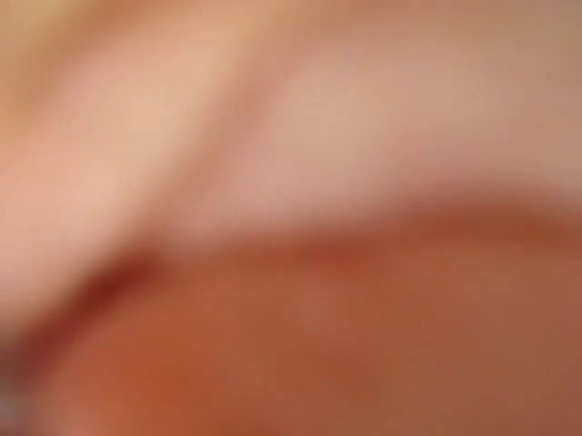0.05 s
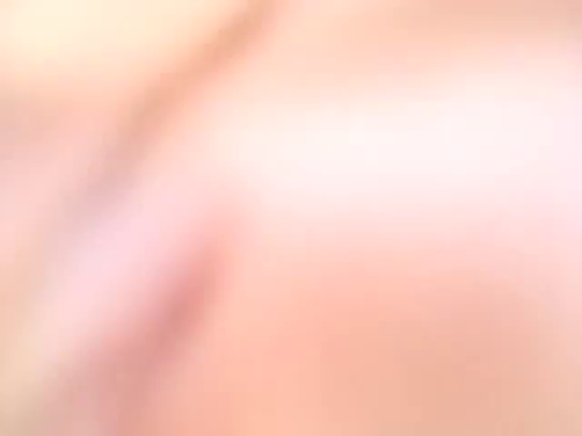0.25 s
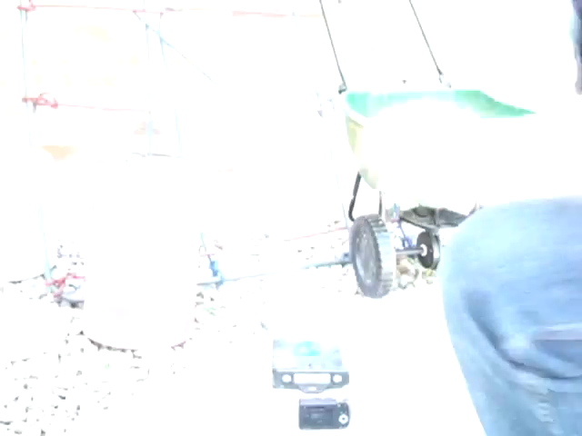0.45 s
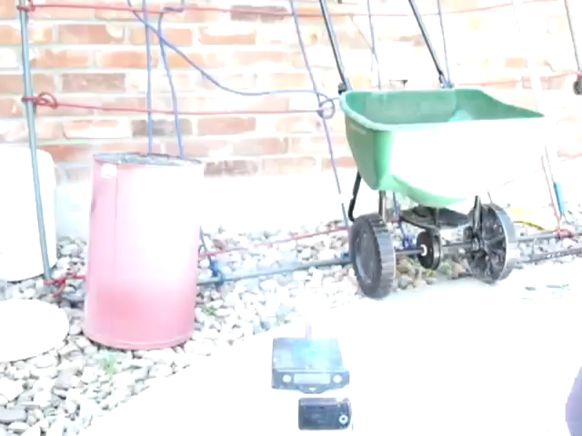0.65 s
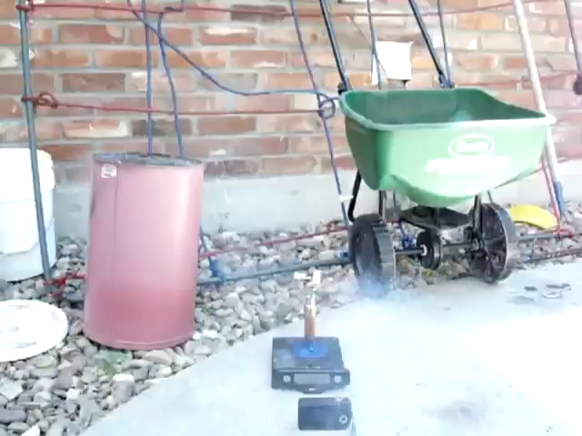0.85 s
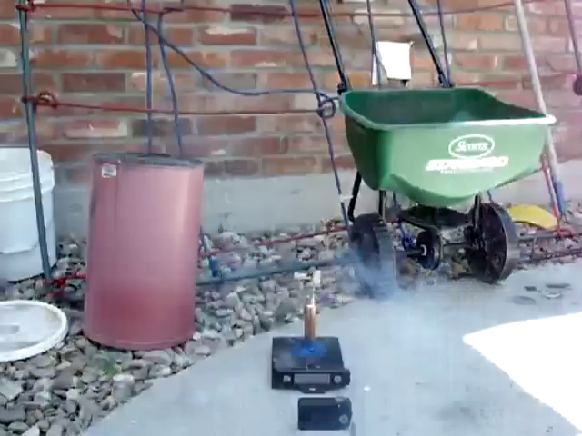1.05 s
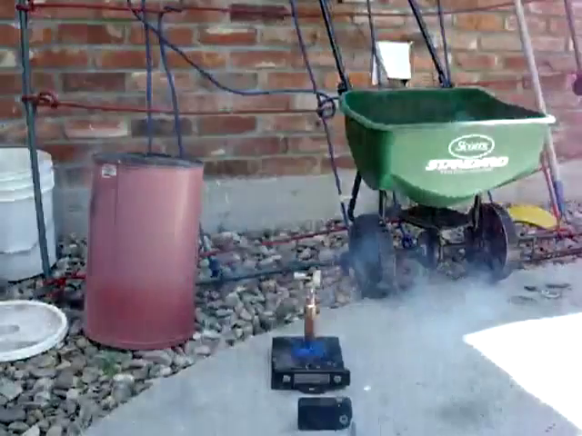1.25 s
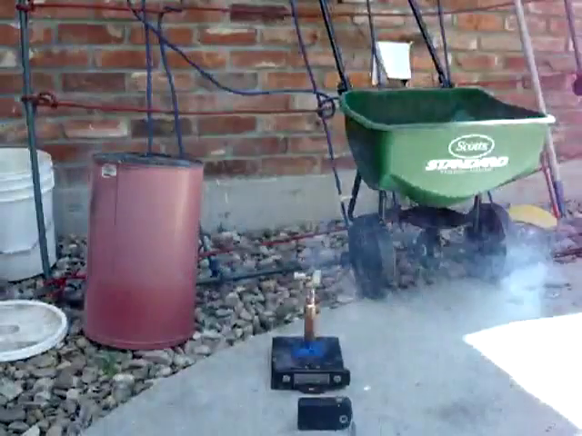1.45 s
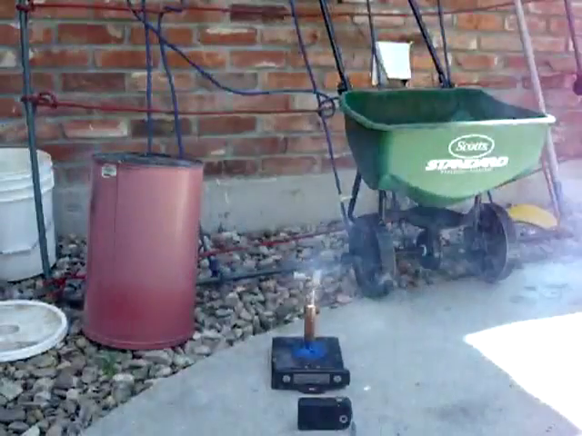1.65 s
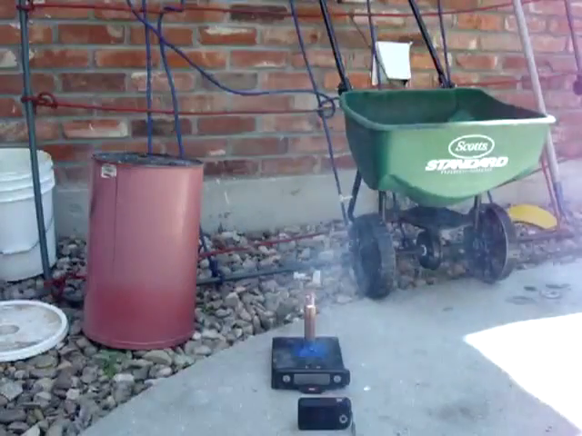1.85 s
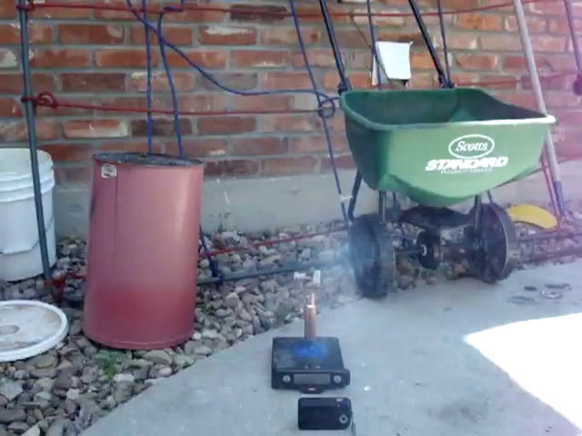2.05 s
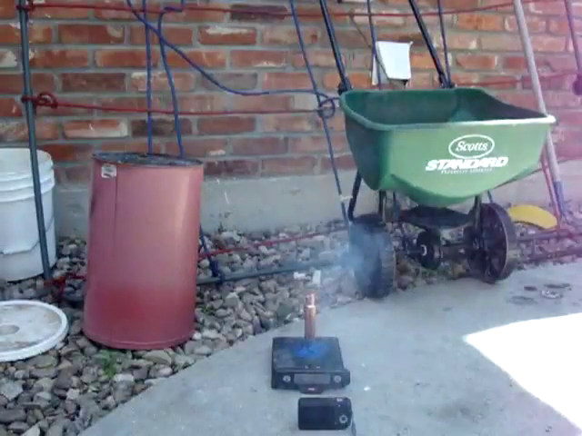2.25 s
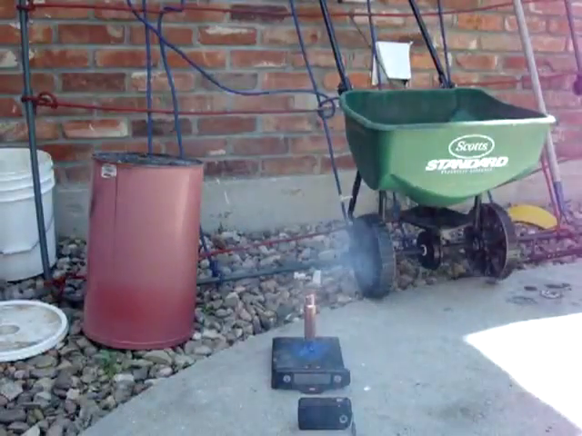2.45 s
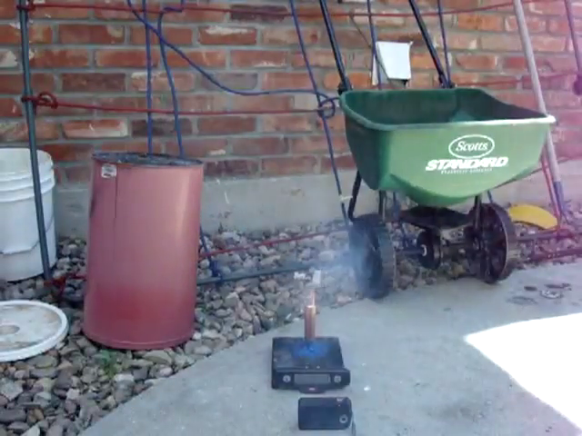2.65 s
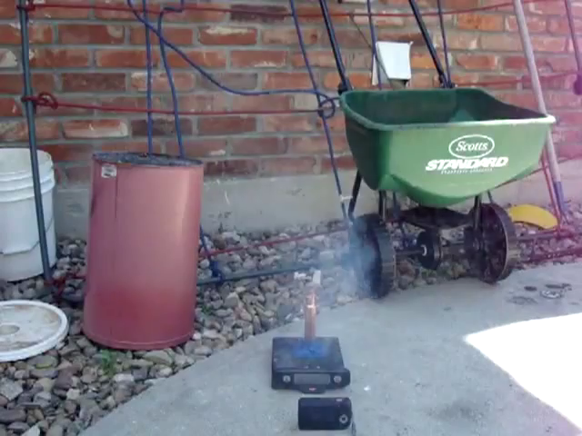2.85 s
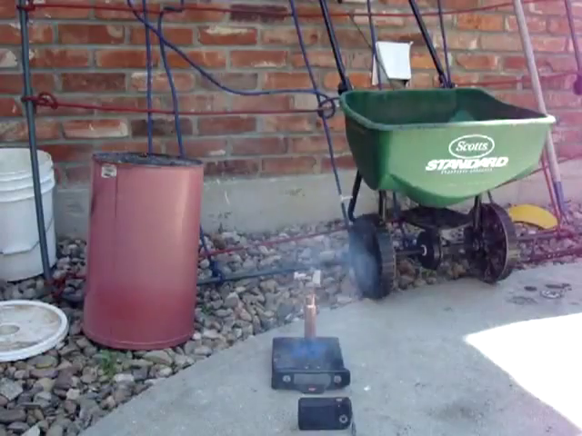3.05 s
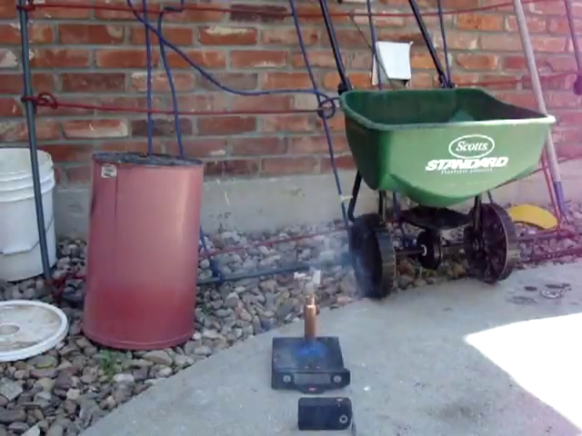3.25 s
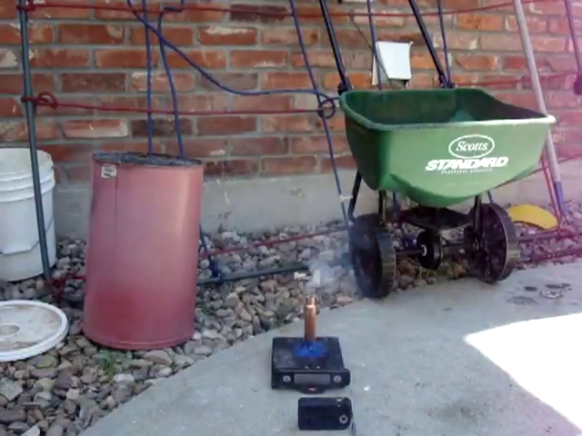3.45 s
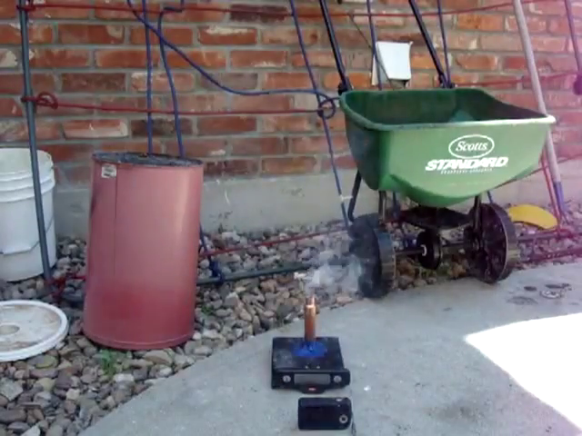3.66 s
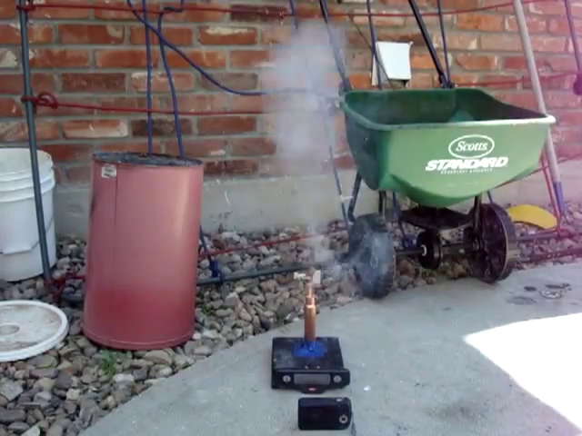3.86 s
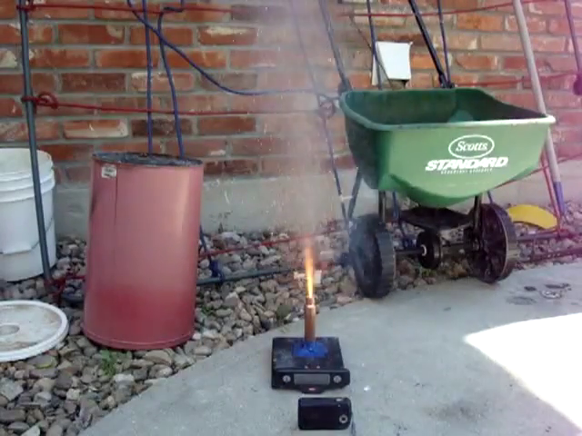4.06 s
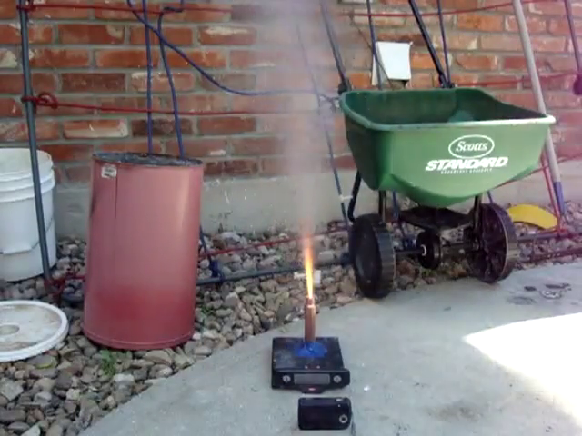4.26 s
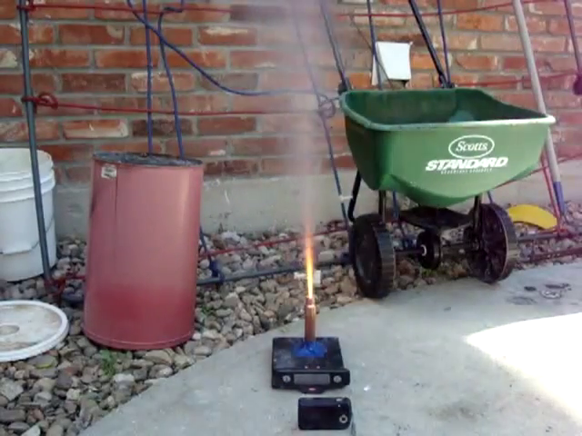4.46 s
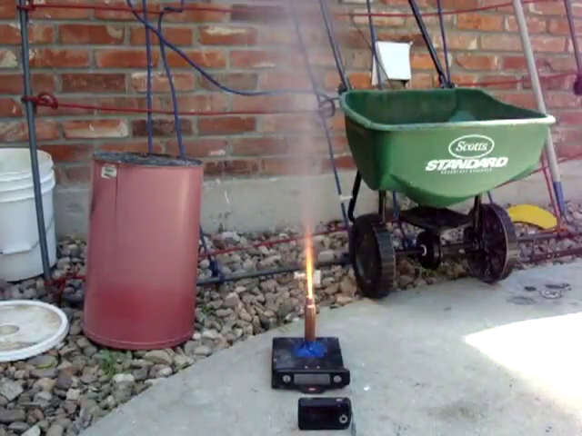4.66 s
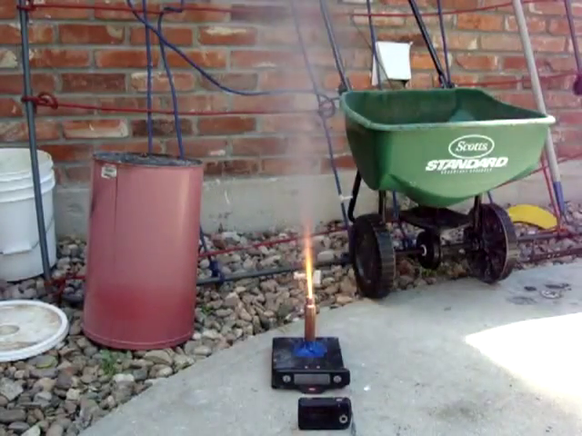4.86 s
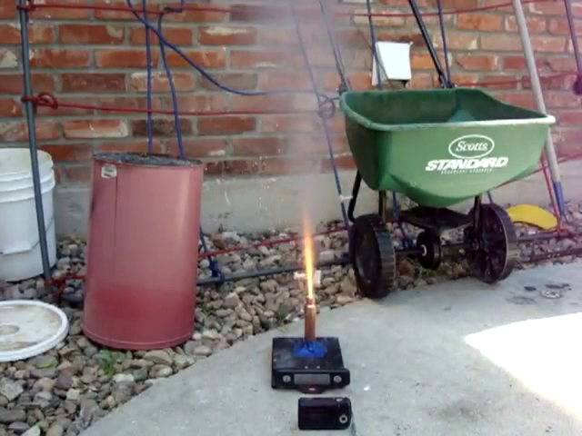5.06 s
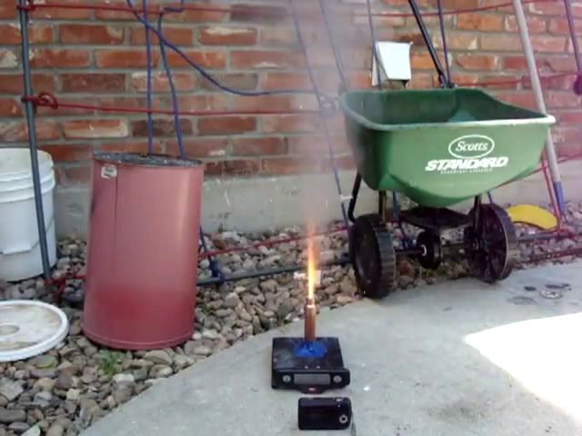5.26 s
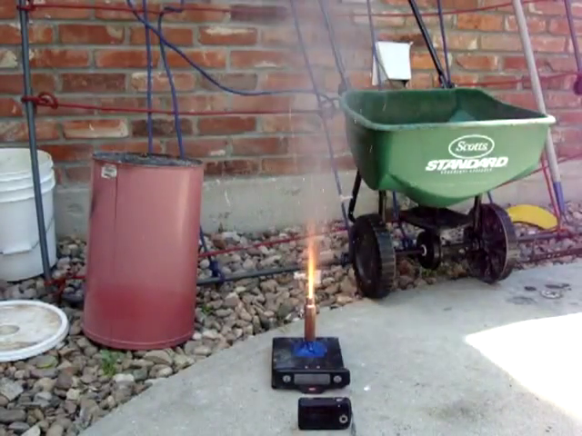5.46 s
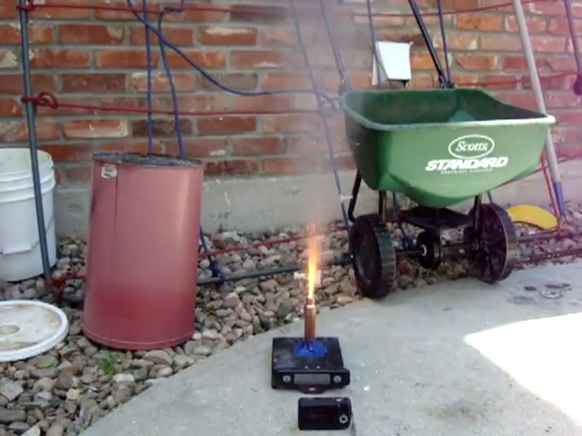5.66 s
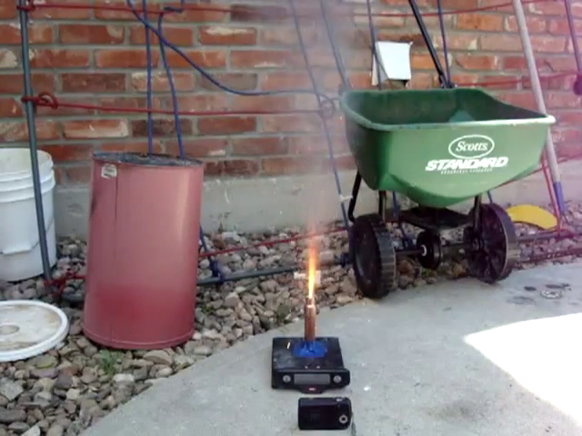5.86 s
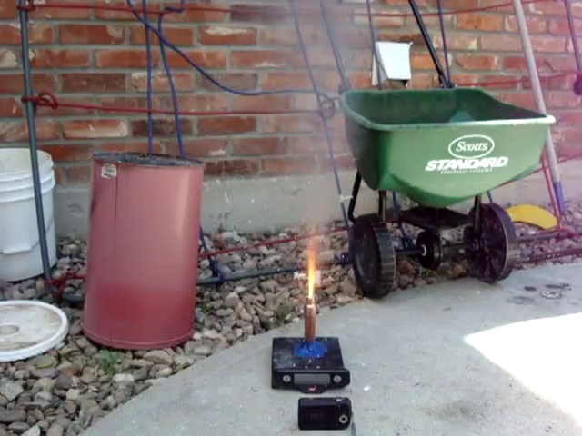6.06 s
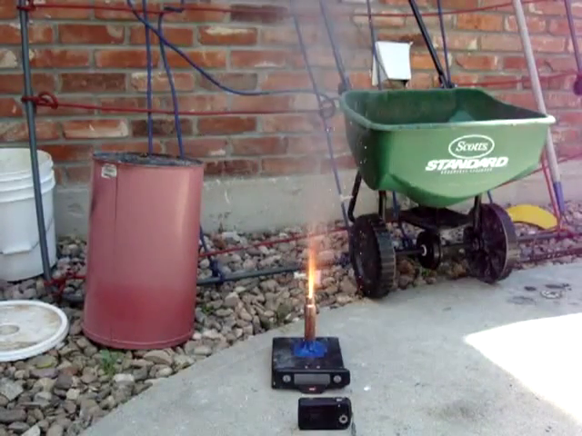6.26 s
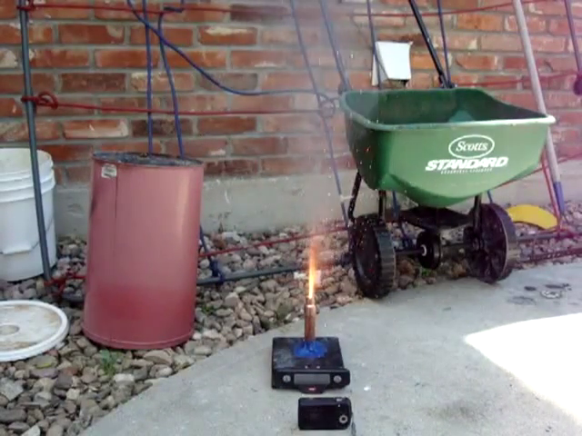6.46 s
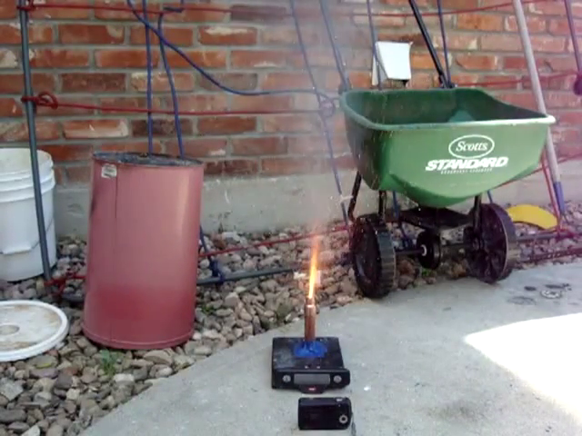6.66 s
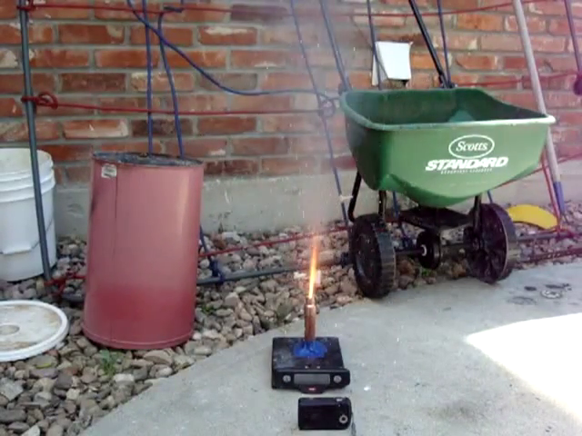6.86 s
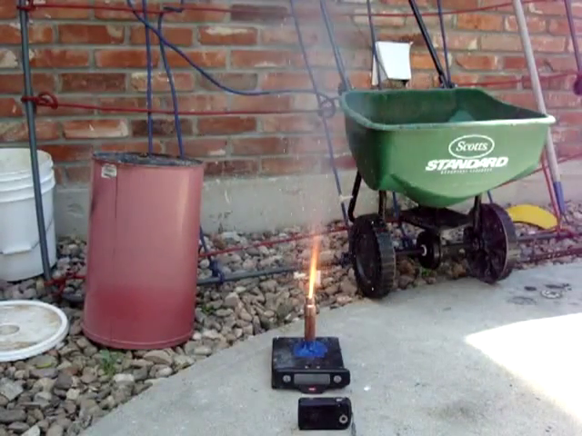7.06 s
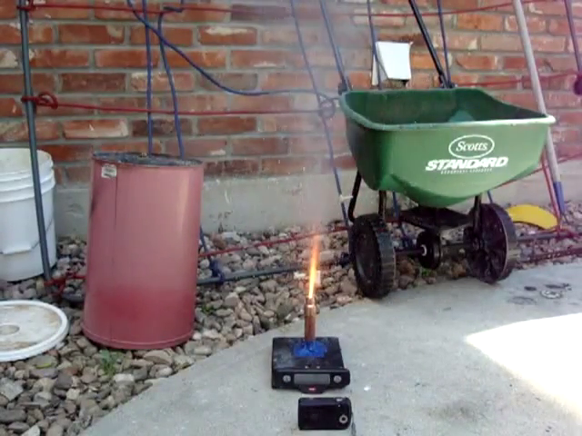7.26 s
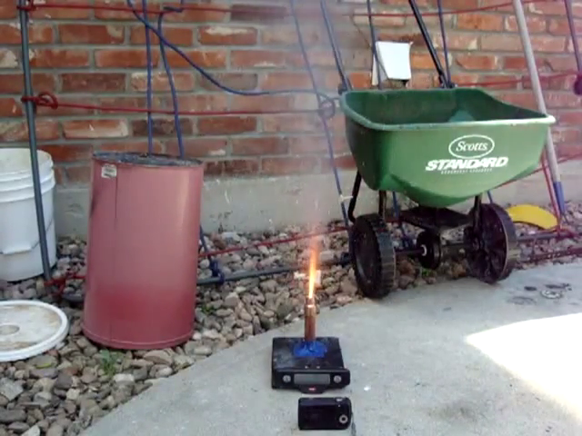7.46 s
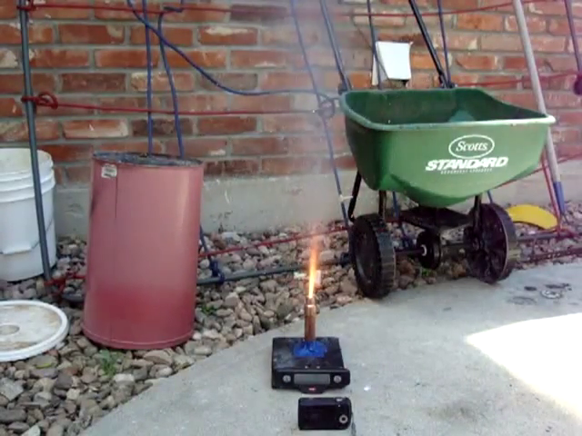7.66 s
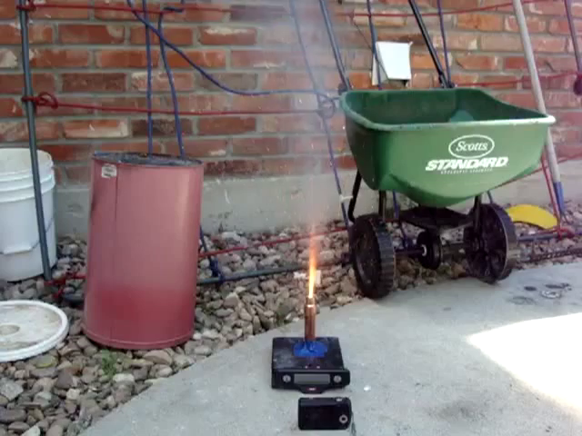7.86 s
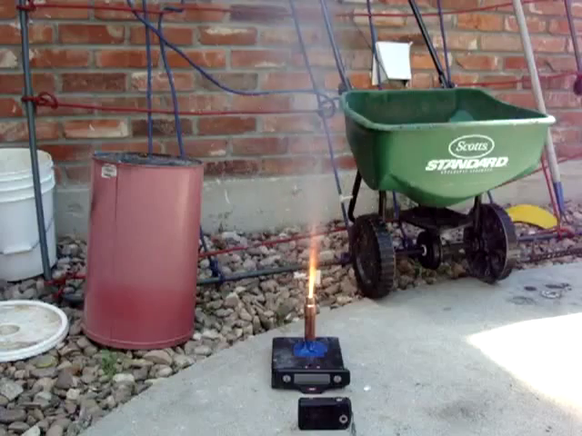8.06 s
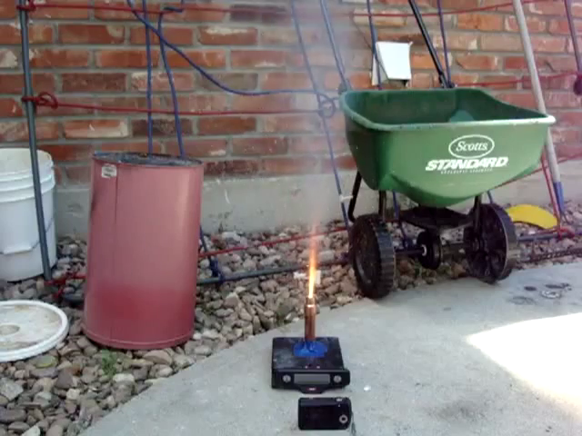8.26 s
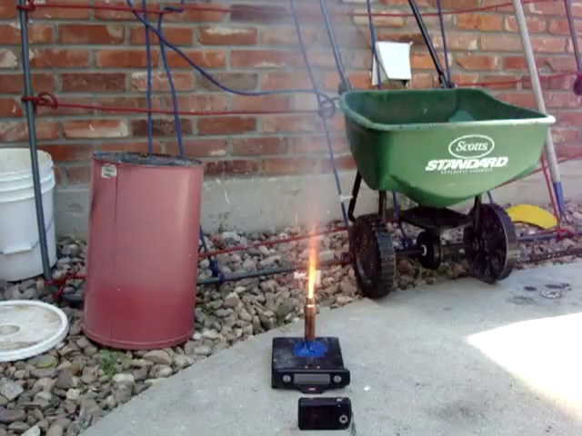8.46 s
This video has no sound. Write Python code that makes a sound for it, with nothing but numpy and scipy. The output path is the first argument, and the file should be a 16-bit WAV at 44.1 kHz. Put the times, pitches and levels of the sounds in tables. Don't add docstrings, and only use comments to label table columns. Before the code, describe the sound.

Faint town rumble and light wind puffs lie behind a bright, sputtering fuse. Footsteps grind on grit, one very hard knock stands out, and a shoe drags briefly. After a quiet smouldering pause, a small rocket motor ignites abruptly: loud screeching hiss, slightly thinner for a moment, then a fuller steady roar with irregular crackling pops, still burning at the cut. Close outdoor pocket camera sound, dull at the very top, with short reflections.

```python
import sys
import numpy as np
from scipy import signal
from scipy.fft import rfft, irfft, next_fast_len
from scipy.io import wavfile

SR = 44100
rng = np.random.default_rng(int(sys.argv[2]) if len(sys.argv) > 2 else 0)


def pcm_store(signal):
    levels = np.round(np.clip(np.atleast_2d(signal), -1, 1) * 32767)
    wavfile.write(sys.argv[1], SR, levels.astype(np.int16).T)


def linear_from_db(decibels):
    return 10 ** (np.asarray(decibels, float) / 20)


N = 375732
IGNITION_S = 3.885

# (time [s], level [dB])
JET_HISS = [
    (3.878, -25.5),
    (3.887, -25),
    (3.891, -15),
    (3.97, -9),
    (4.1, -10),
    (4.3, -13),
    (4.55, -16),
    (5.2, -14.5),
    (8.52, -14),
]
# (frequency [Hz], level [dB per Hz])
JET_COLOUR = [(40, -29), (100, -26), (200, -13), (350, -12.5), (600, -5.5), (1000, -4.5), (1500, -3.5),
              (2000, -6), (2800, -7.5), (4200, -4), (6200, -5), (8000, -4), (10500, -5)]
# (time [s], peak level [dB])
FUEL_POPS = [(5.022, -25), (5.085, -22), (5.18, -11), (5.217, -8.5), (5.314, -23), (5.385, -22.5),
             (5.602, -20.5), (5.621, -23), (5.658, -35), (5.708, -11.5), (5.984, -24), (6.055, -10),
             (6.345, -30), (6.623, -21), (7.006, -26), (7.059, -13.5), (7.123, -25.5), (7.175, -16),
             (7.222, -18), (7.318, -17), (7.514, -24.5), (7.553, -13.5), (7.712, -16.5), (7.859, -17.5),
             (8.006, -12), (8.124, -21.5)]
# (peak time [s], level [dB], swell [s])
FLAME_SURGES = [
    (7.72, 4.5, 0.016),
    (7.87, 6, 0.086),
]
# (peak time [s], hiss level [dB], swell [s])
FUSE_FLARES = [(.2, -39, 0.037), (.27, -38.5, 0.091), (.43, -35.5, .15), (.545, -29.5, 0.01),
               (.79, -30.5, 0.37), (.986, -33.5, .02), (1.17, -27, 0.048), (1.43, -29, .1),
               (1.79, -28, 0.037), (1.92, -28, 0.099), (2.07, -28, 0.21), (2.34, -31.5, 0.017),
               (2.54, -29.5, 0.28), (2.88, -30.5, 0.091), (3.12, -33, .04), (3.18, -32.5, .03),
               (3.31, -35.5, 0.041)]
# (frequency [Hz], level [dB per Hz])
FUSE_COLOUR = [(400, -9.5), (800, -14), (1300, -18.5), (2000, -18), (2600, -20), (3100, -15), (3700, -6),
               (4150, -3.5), (4800, -3.5), (5400, -7), (6300, -4), (7200, -8.5), (8300, -3.5),
               (10300, -10.5)]
# (frequency [Hz], width [Hz], level [dB])
TUBE_RESONANCES = [(1810, 220, 6), (2066, 220, 9.5), (2513, 310, 9), (2540, 280, 2), (4260, 1700, -5)]
# (peak time [s], level [dB], swell [s])
BORE_PEEPS = [
    (3.185, -42, 0.017),
    (3.73, -38, 0.023),
    (4.075, -28, 0.013),
]
# (time [s], peak level [dB], body [Hz], body t60 [s], crack re peak [dB])
PLUG_BLOWOUT = [
    (3.889, -27, 251, .036, -6),
]
# (delay [ms], gain, dulled above [Hz])
ECHOES = [(0.82, -0.07, 4000.0), (1.22, 0.05, 12000.0), (1.32, -0.1, 1500.0), (1.79, -0.05, 4000.0),
          (5.08, 0.03, 12000.0), (5.19, -0.04, 4000.0), (5.56, 0.16, 1500.0), (8.0, 0.09, 1500.0),
          (8.44, 0.05, 12000.0), (8.5, 0.19, 1500.0), (8.78, -0.04, 4000.0), (9.77, -0.05, 4000.0),
          (12.49, 0.09, 1500.0), (13.85, -0.1, 1500.0), (14.42, 0.06, 12000.0), (14.49, -0.1, 1500.0),
          (18.59, 0.06, 1500.0), (19.14, -0.08, 1500.0)]
# (time [s], peak level [dB], body [Hz], body t60 [s], crack re peak [dB])
GROUND_KNOCKS = [(1.25, -29, 560, 0.057, -12), (1.349, -10.5, 347, 0.046, -17), (1.3645, -7, 400, .032, -4),
                 (1.445, -22, 666, .036, -15), (1.473, -19, 720, 0.037, -19), (1.506, -25, 486, 0.055, -13),
                 (1.526, -19.5, 538, 0.033, -16), (1.55, -22, 610, 0.029, -10), (1.8222, 4, 454, 0.025, -2),
                 (1.8265, -3.5, 775, 0.043, -7), (1.8355, -7.5, 362, 0.054, -14),
                 (1.844, -11, 490, 0.014, -1), (2.0165, -17.5, 571, 0.028, -18),
                 (2.0845, -12, 630, .028, 0.5), (2.1035, -9.5, 387, 0.07, -10),
                 (2.115, -15, 520, 0.053, -20), (2.204, -24, 398, 0.043, -10), (2.505, -19, 624, 0.02, -2)]
# (time [s], peak level [dB], body [Hz], body t60 [s], crack re peak [dB])
GRIT_CRUNCHES = [
    (.953, -17, 318, 0.03, -12),
    (.961, -11, 213, 0.015, -20),
    (.979, -20, 390, 0.094, 2),
    (.992, -25, 900, 0.054, 0),
    (1.13, -29, 294, 0.11, -6),
    (1.15, -26, 300, 0.046, 5),
    (1.7825, -5, 430, 0.052, -5.5),
    (1.785, -8.5, 397, 0.017, -6.5),
    (1.791, -18, 496, 0.051, -1),
    (1.798, -22.5, 378, .04, 2),
]
# (time [s], level [dB])
SCUFF_LEVEL = [
    (2.76, -57),
    (2.784, -49),
    (2.836, -39),
    (2.87, -29),
    (2.94, -22),
    (3.0, -34.5),
    (3.04, -43),
]
# (time [s], peak level [dB], body [Hz], body t60 [s], crack re peak [dB])
SCUFF_CATCHES = [
    (2.788, -28, 232, 0.082, -14),
    (2.849, -19, 283, .04, -18),
    (2.887, -11.5, 497, 0.024, -10),
    (2.922, -10, 630, 0.019, -14),
    (2.938, -15, 456, 0.084, -18),
    (2.962, -27, 590, .03, -18),
]
# (frequency [Hz], level [dB per Hz])
SCUFF_COLOUR = [(41, -51), (70, -23), (215, 1.5), (347, -6), (397, 2), (428, -6), (802, -5.5), (1260, -22),
                (2500, -21.5), (3250, -56), (5500, -120)]
# (time [s], level [dB])
YARD_LEVEL = [
    (0.0, -48.5),
    (.85, -44),
    (2.0, -45),
    (3.89, -49.5),
    (4.15, -71),
    (5.65, -62),
    (8.52, -71),
]
# (frequency [Hz], level [dB per Hz])
YARD_COLOUR = [(26, -48), (45, -20.5), (103, -7.5), (156, -11), (370, -7.5), (600, -7), (900, -7),
               (1300, -9.5), (2000, -11.5), (3000, -12), (4500, -13.5), (5500, -21.5), (7500, -26),
               (10300, -29)]
# (peak time [s], level [dB], swell [s])
DEEP_SWELLS = [(.06, -41, .08), (.75, -47, .05), (.97, -48, .05), (1.35, -53, .05), (1.66, -40, .05),
               (1.83, -44, .04), (2.36, -44, .04), (2.48, -41, .06), (3.16, -51, .05), (3.48, -51, .1),
               (3.63, -52, .04), (3.96, -32, 0.061), (4.15, -54, .1), (4.65, -48, 0.052), (4.87, -45, 0.067),
               (5.54, -49, .05), (5.77, -50, 0.16), (6.38, -56, .05), (6.5, -51, .05), (7.06, -52, .05),
               (7.28, -46, 0.14), (7.95, -53, .06), (8.16, -46, .05), (8.3, -55, .05)]
# (time [s], length [s], boost [dB])
TICK_SPELLS = [
    (3.17, 0.37, 15),
    (4.65, 0.22, 12),
    (5.55, .25, 8),
    (6.38, .05, 8),
    (7.05, 0.22, 8),
    (7.95, 0.27, 9),
]
# (frequency [Hz], level [dB])
TOP_CUT = [(9990, 0), (10090, -11), (10180, -30), (10250, -80), (10300, -120)]


def jet():
    gate, hiss_db = in_time(JET_HISS)
    mid_db, low_db = flame_balance()
    flutter = drift(45)
    since = np.arange(N) / SR - IGNITION_S
    pops = np.zeros(N)
    for s, db in FUEL_POPS:
        pops[round((s + .002) * SR)] = linear_from_db(db + 43) * rng.choice([-1, 1])
    turbulence = rng.standard_normal(N) + 0.52 * grains(1500, spread_db=1.0)
    lumps = .5 * grains(60, spread_db=-1.0) + pops

    low, rest = split(coloured(turbulence, JET_COLOUR), 1570)
    mid, high = split(rest, 4880)
    lump_thuds = split(coloured(lumps, JET_COLOUR), 2000)[0] / low.std()
    low = rms_one(low) * linear_from_db(2.44 * flutter) + 0.74 * lump_thuds
    low = band(rms_one(low), 110, 9000)
    out = rms_one(high) * linear_from_db(.4 * flutter + .3 * drift(25))
    out += rms_one(mid) * linear_from_db(mid_db + .8 * flutter + .3 * drift(25))

    screech_db = -14 - 46 * np.maximum(since - .07, 0)
    out += linear_from_db(screech_db) * rms_one(resonance(turbulence, 4680, 1000))
    whoomp_db = -21.5 - 200 * np.maximum(since - .06, 0)
    out += linear_from_db(whoomp_db) * rms_one(band(turbulence, 110, 696))
    barrel = linear_from_db(-18) * rms_one(resonance(resonance(low, 352, 127), 352, 127))
    deep, upper = split(low + barrel, 690)
    hollow_db = -5 * (step(4.2, .06) - step(4.8, .1))
    out += (deep * linear_from_db(hollow_db) + upper) * linear_from_db(low_db + 4.0)
    return gate * linear_from_db(hiss_db - 1.35) * out


def flame_balance():
    full = step(4.66, .71)
    surge_db = swells(FLAME_SURGES, 6, 61, 0)
    blast_fade_db = 200 * np.maximum(np.arange(N) / SR - IGNITION_S - .06, 0)
    mid_thin_db, mid_full_db, mid_blast_db = -13, -6.5, -6
    low_thin_db, low_full_db, low_blast_db = -32, -20, -21.5
    mid_db = np.maximum(mid_thin_db + (mid_full_db - mid_thin_db) * full, mid_blast_db - blast_fade_db)
    low_db = np.maximum(low_thin_db + (low_full_db - low_thin_db) * full, low_blast_db - blast_fade_db)
    return mid_db + 0.38 * surge_db, low_db + surge_db


def fuse():
    t = np.arange(N) / SR
    lit, buried, fired = step(.165, .0075), step(3.34, .006), step(IGNITION_S, .003)
    flares_db = np.where(t < FUSE_FLARES[-2][0], swells(FUSE_FLARES, 3.5, 28, -51.5),
                         swells(FUSE_FLARES[-2:], 3.5, 99, -44))
    hiss_db = (1 - lit) * -46.5 + (lit - buried) * flares_db + buried * -52
    spit = rng.standard_normal(N) + .2 * grains(730, spread_db=-3.0)
    hiss = linear_from_db(hiss_db + 1.1 * drift(16)) * coloured(spit, FUSE_COLOUR)

    gas_db = (1 - lit) * -48 + (lit - buried) * (-37.5 + 0.2 * (flares_db + 31.5))
    gas_db += (buried - fired) * (-38.5 + 9 * np.exp(-abs(t - IGNITION_S) / .065))
    since = np.maximum(t - IGNITION_S, 0)
    gas_db += fired * np.maximum(-21.5 - 150 * since, -20 - 36 * since)
    gas = rng.standard_normal(N)
    tube = np.zeros(N)
    for k, (hz, width_hz, db) in enumerate(TUBE_RESONANCES):
        tube += linear_from_db(db) * (-1) ** k * resonance(gas, hz, width_hz)
    broad = rms_one(band(gas, 1500, 4300))
    bore_noise = band(band(rng.standard_normal(N), 1680, 2700), 1680, 2700)
    bore = linear_from_db(-5.5) * step(3.1, .1) * rms_one(bore_noise)
    smoulder = linear_from_db(gas_db + 2.0 * drift(15)) * (0.69 * rms_one(tube) + 0.25 * broad + bore)
    peeps = linear_from_db(swells(BORE_PEEPS, 13, 600, -90)) * rms_one(resonance(gas, 1830, 90))
    return peeps + (1 - fired) * hiss + smoulder


def walls(x):
    out = x.copy()
    for delay_ms, gain, dull_hz in ECHOES:
        lag = round(delay_ms * SR / 1000)
        r = np.exp(-2 * np.pi * dull_hz / SR)
        out[lag:] += 1.26 * gain * signal.lfilter([1 - r], [1, -r], x)[:-lag]
    return out


def knocks(table, tail_db, crack_t60, grit_low_hz, grit_top_hz):
    out = np.zeros(N)
    t = np.arange(round(.25 * SR)) / SR

    def ring(hz, t60):
        return np.sin(2 * np.pi * hz * t) * linear_from_db(-60 * t / t60)

    snap = 1.9 * ring(1500, .0064) + .5 * ring(2500, .0055) + 0.38 * ring(2000, .012)
    thud = linear_from_db(-32) * ring(105, .038)
    for s, db, hz, t60, crack_db in table:
        chance = rng.uniform(-0.75, 1, 3)
        noise = rng.standard_normal((2, len(t)))
        pitches = hz * np.array([.8, 1.0, 1.9]) * (1 + 0.053 * chance)
        body = np.array([.35, .7, .22]) @ ring(pitches[:, None], max(t60, .005))
        grit = rms_one(band(band(noise[0], grit_low_hz, grit_top_hz), grit_low_hz, grit_top_hz))
        grit = 0.42 * grit * linear_from_db(-60 * t / max(crack_t60, .003))
        tail = linear_from_db(tail_db) * rms_one(band(noise[1], 200, 860)) * linear_from_db(-60 * t / 0.15)
        blow = (body + thud) * (1 - np.exp(-t / 0.0004))
        blow += linear_from_db(crack_db) * (snap + grit) * (1 - np.exp(-t / 0.0005))
        blow += tail * (1 - np.exp(-t / 0.0016))
        i = round(s * SR)
        out[i:i + len(t)] += linear_from_db(db) * blow
    return band(out, 75, 6700)


def scuff():
    gate, level_db = in_time(SCUFF_LEVEL, fade_s=.02)
    slips = coloured(grains(2000, spread_db=-5.0), SCUFF_COLOUR)
    catches = knocks(SCUFF_CATCHES, tail_db=-11, crack_t60=.014, grit_low_hz=900, grit_top_hz=3060)
    return gate * linear_from_db(level_db) * slips + catches


def yard():
    level = linear_from_db(in_time(YARD_LEVEL)[1] + 9)
    rumble = linear_from_db(0.45 * drift(7.8)) * coloured(rng.standard_normal(N), YARD_COLOUR)
    hum = linear_from_db(-16.5) * rms_one(resonance(resonance(rng.standard_normal(N), 98.5, 49), 98.5, 49))
    deep_noise = rms_one(band(band(rng.standard_normal(N), 7, 27), 7, 27))
    deep_layer = linear_from_db(swells(DEEP_SWELLS, 17, 164, -71)) * deep_noise
    return level * (rumble + hum) + deep_layer


def faint_ticks():
    ticks = np.zeros(N)
    ticks[(np.arange(.01, N / SR, 1 / 29.97) * SR).astype(int)] = 1
    boost_db = sum(db * (step(s, .01) - step(s + length, .01)) for s, length, db in TICK_SPELLS)
    return linear_from_db(-64.5 + boost_db) * rms_one(band(ticks, 18, 150))


def rms_one(x):
    return x / np.sqrt(np.mean(x ** 2) + 1e-20)


def in_time(rows, fade_s=.006):
    s, *columns = np.transpose(rows)
    t = np.arange(N) / SR
    gate = np.clip(np.minimum(t - s[0], s[-1] - t) / fade_s + 1, 0, 1)
    return [gate] + [np.interp(t, s, c) for c in columns]


def swells(rows, swell_db, sag_db_per_s, floor_db):
    t = np.arange(0, N, 32) / SR
    level = floor_db
    for s, db, swell_s in rows:
        rise_db = swell_db * (s - t) / max(swell_s, .005)
        level = np.maximum(level, db - np.where(t < s, rise_db, sag_db_per_s * (t - s)))
    return np.interp(np.arange(N) / SR, t, level)


def step(s, width_s):
    return .5 + .5 * np.tanh((np.arange(N) / SR - s) / width_s)


def drift(rate):
    r = np.exp(-80 * np.pi * rate / SR)
    slow = signal.lfilter([1], [1, -2 * r, r * r], rng.standard_normal(N // 40 + 2002))[2000:]
    return np.interp(np.arange(N) / 40, np.arange(len(slow)), rms_one(slow))


def grains(per_s, spread_db):
    sizes = linear_from_db(spread_db * np.minimum(rng.exponential(1, N), 4)) * rng.choice([-1, 1], N)
    return rms_one(sizes * (rng.random(N) < per_s / SR))


def at_hz(points, hz):
    point_hz, db = np.transpose(points)
    return np.interp(np.log(hz), np.log(point_hz), db)


def coloured(x, points):
    size = next_fast_len(N)
    hz = np.arange(size // 2 + 1) * SR / size + 1
    return rms_one(irfft(rfft(x, size) * linear_from_db(at_hz(points, hz)), size)[:N])


def band(x, low_hz, high_hz):
    return signal.sosfilt(signal.butter(2, [low_hz, high_hz], "band", fs=SR, output="sos"), x)


def split(x, hz):
    size = next_fast_len(N)
    share = 1 / (1 + (np.arange(size // 2 + 1) * SR / size / hz) ** 4)
    below = irfft(rfft(x, size) * share, size)[:N]
    return below, x - below


def resonance(x, hz, width_hz):
    r = np.exp(-np.pi * width_hz / SR)
    poles = [1, -2 * r * np.cos(2 * np.pi * hz / SR), r * r]
    return signal.lfilter([(1 - r * r) / 2, 0, (r * r - 1) / 2], poles, x)


def scene():
    plug = knocks(PLUG_BLOWOUT, tail_db=2.5, crack_t60=.02, grit_low_hz=900, grit_top_hz=3060)
    motor = jet() + fuse() + plug
    feet = knocks(GROUND_KNOCKS, tail_db=-14.5, crack_t60=.041, grit_low_hz=900, grit_top_hz=2840)
    feet += knocks(GRIT_CRUNCHES, tail_db=-17.5, crack_t60=.092, grit_low_hz=2000, grit_top_hz=8000)
    return (walls(motor) + feet + scuff() + yard() + faint_ticks())[None]


def treble_gaps(x, share, jump_db):
    hz, _, z = signal.stft(x, SR, nperseg=512, noverlap=384)
    level_db = 10 * np.log10(np.mean(abs(z) ** 2, axis=0) + 1e-12)
    before_rise = np.roll(level_db, -10) - level_db > jump_db
    cells = rng.random((z.shape[0] // 6 + 1, z.shape[1] // 3 + 1))
    cells = np.repeat(np.repeat(cells, 6, axis=0), 3, axis=1)[:z.shape[0], :z.shape[1]]
    dropped = (hz[:, None] > 5200) & ((cells < share) | (before_rise & (cells < .9)))
    return signal.istft(z * np.where(dropped, .1, 1), SR, nperseg=512, noverlap=384)[1][:N]


def low_pass(x):
    return signal.sosfilt(signal.butter(12, 11230, fs=SR, output="sos"), x)


def record(dry):
    x = dry / (1 + (abs(dry) / .93) ** 4) ** .25
    x = treble_gaps(x[0], share=.065, jump_db=11.5)
    size = next_fast_len(N + SR // 10)
    hz = np.arange(size // 2 + 1) * SR / size + 1
    x = irfft(rfft(x, size) * linear_from_db(at_hz(TOP_CUT, hz)), size)[:N]
    return low_pass(x[None])


dry = scene()
out = record(dry)
pcm_store(out)
```